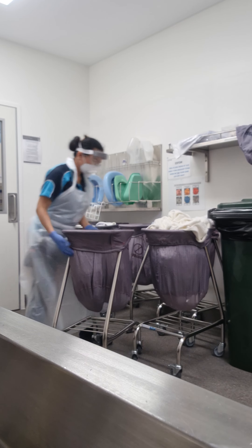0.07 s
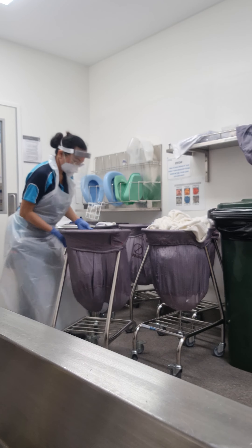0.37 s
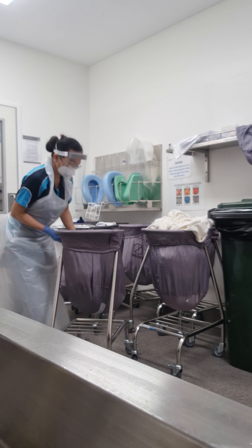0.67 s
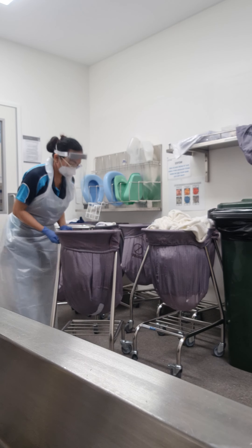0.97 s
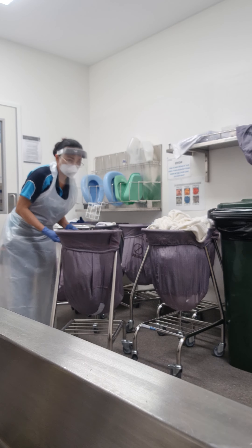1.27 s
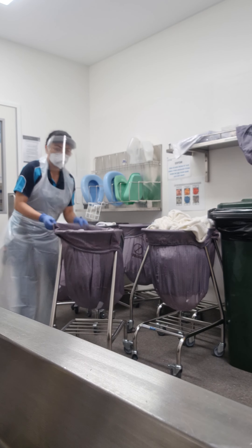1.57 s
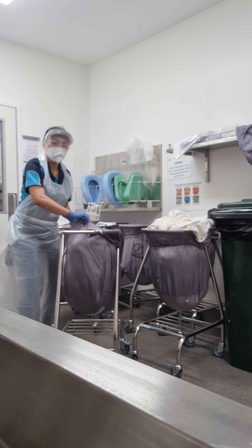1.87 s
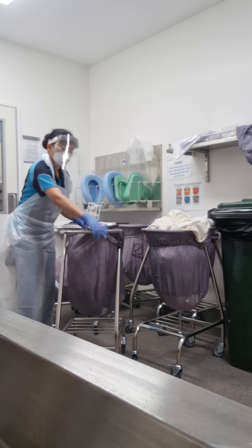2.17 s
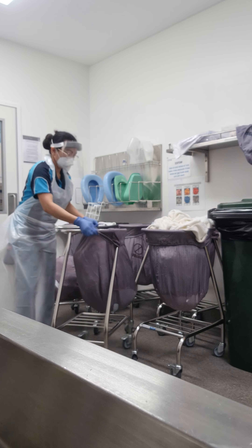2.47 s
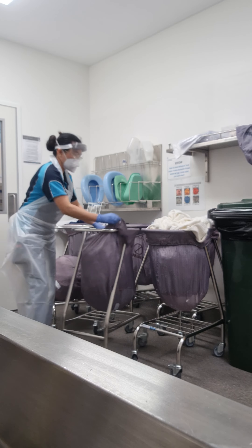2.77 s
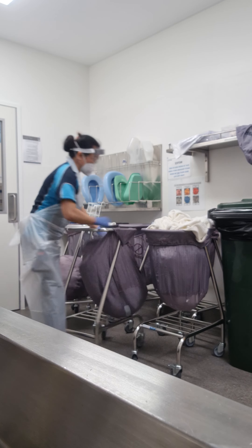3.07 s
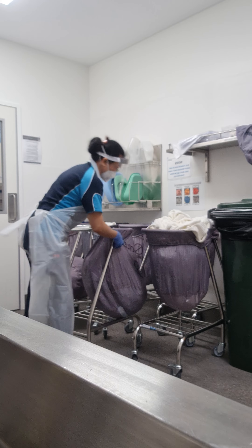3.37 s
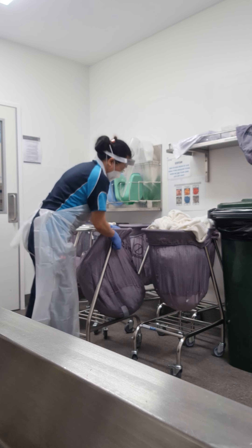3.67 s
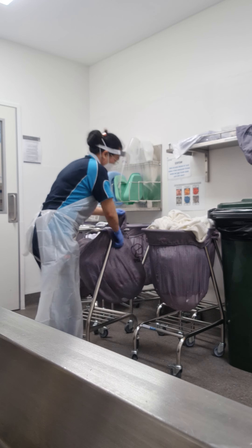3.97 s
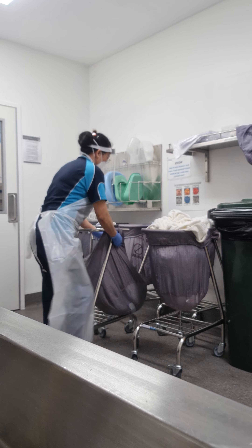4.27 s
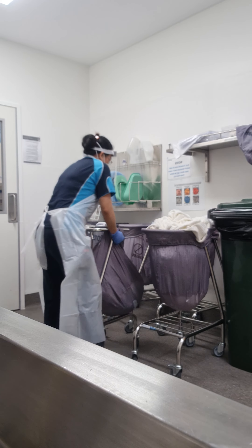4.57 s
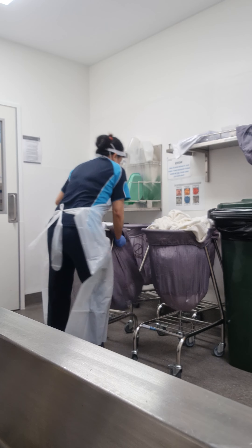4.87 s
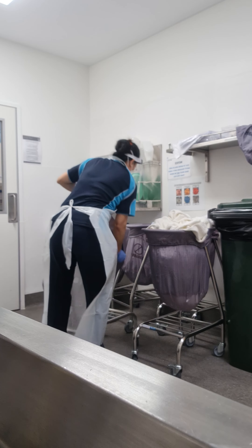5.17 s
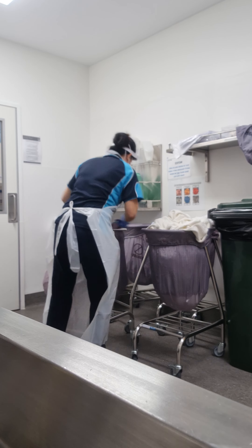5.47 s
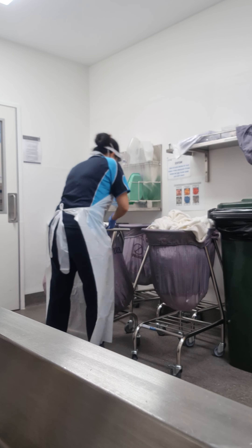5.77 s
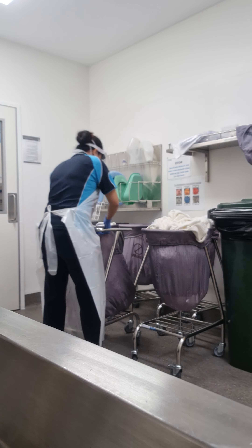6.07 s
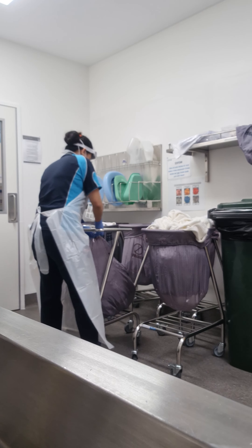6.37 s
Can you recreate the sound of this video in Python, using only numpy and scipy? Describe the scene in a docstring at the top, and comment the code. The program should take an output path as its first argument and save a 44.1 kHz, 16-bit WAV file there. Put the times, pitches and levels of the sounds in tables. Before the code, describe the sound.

In a small, hard-walled room with humming ventilation, soft steps and a scuffing sole mix with rustling plastic. A steel laundry cart is shoved in short bursts, its castors rumbling and its frame rattling, and one wheel squeaks briefly. About halfway it crashes into another cart. Lighter knocks and a small clink follow as it is parked. Everything sounds a few steps away, with a short echo.

```python
"""A steel-tube laundry cart is swung round and parked in a small, hard-walled room; ventilation hums.
Soft steps and a scuffing sole come first; a plastic apron and bags rustle as the arms move.
Shoves set the castors rumbling and the loose frame rattling; one castor sticks and squeaks at 1.7 s.
At 3.1 s the frame crashes against the next cart, and lighter knocks follow.
A small fitting clinks at 5.3 s; a thin tone stands out as the cart comes to rest."""
import sys
import numpy as np
from scipy import signal
from scipy.fft import rfft, irfft, next_fast_len
from scipy.io import wavfile

SR = 44100
rng = np.random.default_rng(int(sys.argv[2]) if len(sys.argv) > 2 else 0)


def materialize(psi):
    """Save the field psi as 16-bit PCM at rate SR to the path in sys.argv[1].

    A 1-D psi becomes a single channel; in a 2-D psi each row is a channel.
    """
    bounded = np.clip(np.atleast_2d(psi).T, -1, 1)
    quanta = np.round(bounded * 32767).astype(np.int16)
    wavfile.write(sys.argv[1], SR, quanta)


N = 283122
TIME = np.arange(N) / SR


def undb(db):
    """Decibels to gain."""
    return 10 ** (np.asarray(db) / 20)


def unit_rms(x):
    """Scale to rms 1."""
    return x / np.sqrt(np.mean(x ** 2))


def unit_energy(x):
    """Scale to a mean energy of 1 per channel."""
    return x / np.sqrt(np.mean(x ** 2) * x.shape[-1])


def at(points, hz):
    """Read (f/Hz, value) points on a log-frequency axis."""
    f, value = np.transpose(points)
    return np.interp(np.log(hz + 1), np.log(f), value)


def shape(x, gain):
    """Filter by gain(hz)."""
    size = next_fast_len(x.shape[-1] + 2048)
    return irfft(rfft(x, size) * gain(np.fft.rfftfreq(size, 1 / SR)), size)[..., :x.shape[-1]]


def colour(x, points):
    """Filter by (f/Hz, level/dB) points."""
    return shape(x, lambda hz: undb(at(points, hz)))


def convolve(x, response):
    """Convolve, cut to the length of x."""
    return signal.fftconvolve(x, response, axes=-1)[..., :x.shape[-1]]


def add(track, t_s, sound):
    """Mix a sound in at t_s."""
    start = int(t_s * SR)
    track[start:start + len(sound)] += sound[:N - start]


def walk(rate_hz):
    """Random drift, spread near 1."""
    knots = rng.standard_normal(1024)
    return np.interp(TIME * rate_hz, np.arange(len(knots)), knots)


def fade(t60_s):
    """Exponential decay, 0.5 s long."""
    return np.exp(-np.log(1000) * TIME[:SR // 2] / t60_s)


def swell(rows):
    """Envelope through (t/s, level/dB) rows; silent outside them."""
    t_s, db = np.transpose(rows)
    return undb(np.interp(TIME, t_s, db, left=-np.inf, right=-np.inf))


def gestures(rows, attack_s, release_s):
    """Power-summed envelope of (t/s, length/s, level/dB) holds; attack and release are per 20 dB."""
    power = 0
    for t_s, length_s, db in rows:
        away = np.maximum(t_s - TIME, 0) / attack_s + np.maximum(TIME - t_s - length_s, 0) / release_s
        power = power + undb(db - 20 * away) ** 2
    return np.sqrt(power)


def grains(rate_hz, spread_db):
    """Dense random clicks of uneven size, rms 1."""
    sizes = undb(spread_db * np.minimum(rng.exponential(size=N), 4))
    return unit_rms((rng.random(N) < rate_hz / SR) * sizes * rng.standard_normal(N))


def thud(points, t60_s):
    """Decaying noise burst coloured by (f/Hz, level/dB) points."""
    return unit_energy(colour(rng.standard_normal(SR // 2), points) * fade(t60_s))


# Stereo width: f/Hz, side minus mid/dB
SIDE_LEVEL = [(60, -14), (150, -17), (280, -22), (500, -10), (1000, 2.5), (2200, -1), (5000, 0)]
def diffuse(size):
    """Noise from all sides: alike left and right in the bass, unrelated in the treble."""
    mid, side = rng.standard_normal((2, size))
    side = colour(side, SIDE_LEVEL)
    stereo = np.array([mid + side, mid - side])
    return shape(stereo, lambda hz: 1 / np.sqrt(1 + undb(at(SIDE_LEVEL, hz)) ** 2))


# Standing-wave peaks and dips: f/Hz, level/dB
ROOM_SPECTRUM = [(120, 0), (165, 7), (210, -11.5), (290, 2), (390, -2), (480, -0.5), (800, 1.5)]
# Room decay: f/Hz, t60/s
ROOM_DECAY = [(100, 0.58), (500, 0.78), (2500, 0.61), (6000, 0.59), (14000, 0.39)]
def room(direct_db, build_s=0.0014, right_lag_s=0.00032):
    """Direct sound arrives left first; close bare walls follow with a dense tail."""
    t = TIME[:SR]
    noise = colour(diffuse(SR), ROOM_SPECTRUM)
    octaves = np.log2(125) + np.arange(8)
    tail = 0
    for octave, share in zip(octaves, np.eye(len(octaves))):
        band = shape(noise, lambda hz: np.interp(np.log2(hz + 1), octaves, share))
        tail = tail + band * np.exp(-np.log(1000) * t / at(ROOM_DECAY, 2 ** octave))
    response = unit_energy(tail * (1 - np.exp(-t / build_s)))
    response[0, 0] += undb(direct_db)
    response[1, int(right_lag_s * SR)] += undb(direct_db)
    return unit_energy(response)


# Duct noise: f/Hz, relative level/dB
AIR_SPECTRUM = [(15, -55.5), (25, -7), (49, -9), (109, -3), (139, -9), (278, -4.5), (318, -10.5),
                (475, -14.5), (558, -22), (790, -16), (927, -24.5), (1960, -20), (2130, -27), (5570, -27),
                (15000, -41.5)]
# Fan and mains lines: f/Hz, level/dB re hum_db
HUM_LINES = [(60, -59), (103, -59), (120, -62.5), (166.9, -62.5), (204.6, -81), (247.6, -63.5),
             (484.5, -68), (990.5, -82.5), (1981, -74.5)]
def ventilation(air_db=-53, hum_db=-1, flutter_db=2, wander_hz=1.173):
    """Duct noise with wavering fan and mains lines."""
    air = unit_rms(colour(diffuse(N), AIR_SPECTRUM + [(16000, -64)]))
    air = colour(air, [(1000, -0.5), (3000, 1), (8000, -2.5)]) * undb(0.5 * walk(6.7))
    hum = 0
    for hz, db in HUM_LINES:
        amplitude = np.sqrt(2) * undb(db + flutter_db * walk(5.2))
        phase = 2 * np.pi * np.cumsum(hz + wander_hz * walk(11)) / SR
        hum = hum + amplitude * np.sin(phase)
    return undb(air_db) * air + undb(hum_db) * hum


def thin_tone(hz=1981):
    """A faint steady pitch swells as the cart is parked."""
    return np.sin(2 * np.pi * hz * TIME) * swell([(5.5, -67), (5.9, -64), (6.42, -73)])


# Footfalls: t/s, level/dB re step_db
FOOTFALLS = [(0.039, -44), (0.801, -45), (1.999, -51), (3.25, -45), (4.243, -55), (4.831, -51),
             (5.2, -42.5), (5.618, -41)]
def steps(step_db=26):
    """Soft soles thump the floor."""
    spectrum = [(25, -35), (58, 7.5), (100, -7), (170, -15.5), (400, -25), (2000, -38)]
    out = np.zeros(N)
    for t_s, db in FOOTFALLS:
        add(out, t_s, undb(db + step_db) * thud(spectrum, t60_s=0.24))
    return out


# Slide of the sole: t/s, level/dB
SCUFF_ENVELOPE = [(.38, -62), (.44, -48.5), (.52, -47), (.58, -57), (.63, -76)]
# Grit under the sole: f/Hz, relative level/dB
SCUFF_SPECTRUM = [(200, -27), (600, -2), (1050, -4.5), (1800, -1), (3200, -0.5), (6500, -4.5), (8000, -16),
                  (15000, -23)]
def scuff():
    """A rubber sole drags over fine grit."""
    grit = colour(grains(rate_hz=6600, spread_db=4.5), SCUFF_SPECTRUM)
    return unit_rms(grit) * swell(SCUFF_ENVELOPE)


# Arm movements: t/s, length/s, level/dB
ARM_MOVES = [(.14, 0.034, -55), (.44, .04, -57.5), (.84, .19, -61), (1.66, 0.047, -53), (1.88, 0.16, -50),
             (2.26, 0.025, -55), (2.58, 0.078, -53), (3.18, 0.11, -43), (3.82, 0.033, -48),
             (4.22, 0.076, -48), (4.55, 0.26, -53.5), (5.14, .12, -51.5), (5.61, 0.043, -52)]
# Faint stirring of the apron: t/s, length/s, level/dB
APRON_STIR = [(0, 6.08, -63.5)]
# Creasing: f/Hz, relative level/dB
RUSTLE_SPECTRUM = [(400, 0), (1500, -2), (3500, -4.5), (6500, -2.5), (8000, -9.5), (11500, -10.5),
                   (15500, -13)]
def rustle():
    """Thin plastic and cloth crease in tiny snaps as the arms move."""
    creasing = gestures(ARM_MOVES + APRON_STIR, attack_s=0.39, release_s=0.33)
    snaps = colour(grains(rate_hz=5900, spread_db=6.0), RUSTLE_SPECTRUM)
    return unit_rms(snaps) * creasing


# Castor squeak: t/s, length/s, level/dB
CASTOR_SLIPS = [(1.728, 0.033, -33.5)]
def squeak(resonance_hz=2468, waver=0.0035):
    """A dry castor sticks and slips at one resonance, almost a pure tone."""
    pitch_hz = resonance_hz * (1 + waver * walk(150))
    slipping = gestures(CASTOR_SLIPS, attack_s=0.022, release_s=0.06)
    return np.sqrt(2) * np.sin(2 * np.pi * np.cumsum(pitch_hz) / SR) * slipping


def chatter(length_s, count=24, scatter_db=2.0):
    """Force of loose metal meeting: an uneven run of contacts that builds, then lets go."""
    progress = (np.arange(count) + rng.random(count)) / count
    sizes = rng.choice([-1, 1], count) * undb(scatter_db * rng.standard_normal(count))
    arch = np.sin(np.pi * progress ** 0.52)
    force = np.zeros(SR // 2)
    np.add.at(force, (progress * length_s * SR).astype(int), sizes * arch)
    return unit_energy(force)


def ring(modes, t60_3khz_s, split=0.0065):
    """Steel modes in close pairs, as a tube bends in two planes; high ones die sooner."""
    t = TIME[:SR // 3]
    hz, db = np.repeat(modes, 2, axis=0).T[..., None]
    hz = hz * (1 + split * (2 * rng.random(hz.shape) - 1))
    waves = np.sin(2 * np.pi * (hz * t + rng.random(hz.shape)))
    decay = np.exp(-np.log(1000) * t / (t60_3khz_s * np.sqrt(3000 / hz)))
    weights = undb(db + 2 * rng.standard_normal(db.shape))
    return unit_energy(np.sum(weights * waves * decay, axis=0))


def taps(events, modes, t60_3khz_s, strike_db):
    """A loose part chatters against the frame and rings in its own modes."""
    out = np.zeros(N)
    for t_s, db, length_s in events:
        ringing = convolve(chatter(length_s), ring(modes, t60_3khz_s))
        add(out, t_s, undb(db + strike_db) * unit_energy(ringing))
    return out


# Fitting contacts: t/s, level/dB re strike_db, chatter/s
FITTING_HITS = [(5.255, -28.5, .007), (5.260, -36.5, 0.012)]
# Fitting modes: f/Hz, relative level/dB
FITTING_PARTIALS = [(2310, -8.5), (2487, -17), (4560, -7), (4690, -7), (4810, 4.5), (4970, -0.5), (5140, 3),
                    (5290, -12), (6950, -10), (9350, -33)]
def fitting():
    """A small steel fitting clinks."""
    return taps(FITTING_HITS, FITTING_PARTIALS, t60_3khz_s=0.015, strike_db=30)


# Hoop contacts: t/s, level/dB re strike_db, chatter/s
HOOP_HITS = [(0.512, -55, 0.031), (0.79, -58, 0.016), (3.768, -26.5, 0.0098), (3.782, -42, .025),
             (3.978, -43.5, .025), (5.295, -44, 0.025), (5.565, -45.5, 0.027), (5.672, -43, 0.027)]
# Hoop modes: f/Hz, relative level/dB
HOOP_PARTIALS = [(1790, 0), (2080, 1), (2335, 1.5), (2465, 4), (2585, -5), (3020, 1), (3220, -6)]
def hoop():
    """The hoop holding the bag knocks, barely ringing."""
    return taps(HOOP_HITS, HOOP_PARTIALS, t60_3khz_s=0.012, strike_db=31.5)


# Shelf contacts: t/s, level/dB re strike_db, chatter/s
SHELF_HITS = [(2.02, -41, .045), (2.665, -42.5, 0.01), (2.88, -48, 0.02), (3.089, -17.5, 0.0042),
              (3.128, -22, 0.0055), (3.772, -30, .02), (4.612, -35.5, .018)]
# Shelf modes: f/Hz, relative level/dB
SHELF_PARTIALS = [(2280, -15.5), (3070, -6), (3680, -1), (4310, -7), (4400, 4.5), (4870, -2), (5650, -0.5),
                  (6780, -5), (8660, -4), (11500, -23)]
def shelf():
    """The wire shelf is jolted and rings briefly."""
    return taps(SHELF_HITS, SHELF_PARTIALS, t60_3khz_s=0.049, strike_db=25.5)


# Wires and joints: f/Hz, relative level/dB
CLATTER_SPECTRUM = [(150, -21), (310, -19), (400, -14.5), (640, -8), (1050, -10.5), (1370, -6.5),
                    (1900, -4.5), (2350, 4.5), (3100, -4), (4500, -7), (6900, -15), (8000, -19),
                    (11600, -24), (15500, -34)]
# Tube modes: f/Hz, relative level/dB
TUBE_PARTIALS = [(1328, -8), (2287, 4), (2356, 6), (2451, -6), (2569, 0.5), (2767, -2), (2831, -12.5),
                 (2975, 4), (3051, -7.5), (3109, 1.5), (3260, 0.5), (3354, -10), (3656, -16.5),
                 (3721, -13.5), (4001, -5.5), (4308, -2), (4533, -1), (4683, -5), (4823, -2), (5464, -15),
                 (6470, -11), (6980, -5.5), (11500, -3)]
def frame(force, clatter_t60_s=0.0076, ring_db=-4):
    """Each contact sets off a brief clatter of wires and joints and rings the tubes."""
    energy = convolve(force ** 2, fade(clatter_t60_s) ** 2)
    clatter = colour(np.sqrt(np.abs(energy)) * rng.standard_normal(len(force)), CLATTER_SPECTRUM)
    tubes = convolve(force, ring(TUBE_PARTIALS, t60_3khz_s=0.083, split=0.0048))
    return np.std(force) * (unit_rms(clatter) + undb(ring_db) * unit_rms(tubes))


# Shoves: t/s, length/s, rumble level/dB, joint drive level/dB
CART_SHOVES = [(0.0, .03, -55, -66), (0.504, 0.022, -57, -46), (.79, 0.025, -65, -66.5),
               (1.939, 0.075, -50, -37), (2.25, .04, -54, -61), (2.78, 0.18, -57.5, -44),
               (3.06, 0.16, -49, -58), (3.88, 0.089, -59, -53.5), (4.212, .04, -55.5, -66),
               (4.457, 0.03, -52.5, -70), (5.19, 0.12, -59.5, -40), (5.57, 0.068, -53, -48)]
# Castor rumble: f/Hz, relative level/dB
RUMBLE_SPECTRUM = [(100, -21), (280, 4.5), (400, -2), (620, 0), (1050, -11.5), (1500, -8.5), (2500, -19),
                   (6000, -56.5)]
def rolling(rattle_db=-1, creep_db=-64.5, attack_s=0.15, release_s=0.053):
    """Shoved castors bump over the gritty floor and shake loose joints; between shoves they creep."""
    t_s, length_s, castor_db, joint_db = np.transpose(CART_SHOVES)
    travel = gestures(zip(t_s, length_s, castor_db), attack_s, release_s) + undb(creep_db)
    shaking = gestures(zip(t_s, length_s, joint_db), attack_s, release_s)
    force = grains(rate_hz=830, spread_db=5.0) * shaking
    rattle = colour(frame(force), [(500, -7), (2500, -5.5), (5000, -7.5), (12000, 0.5)])
    rumble = unit_rms(colour(grains(rate_hz=1800, spread_db=1.5), RUMBLE_SPECTRUM)) * travel
    return undb(rattle_db) * rattle + rumble


# Blows on the frame: t/s, level/dB re strike_db, chatter/s, treble tilt/(dB/octave), base gain/dB
FRAME_HITS = [(0.780, -50, 0.019, -3, -1), (1.985, -36, .05, -3, 2), (2.663, -42, 0.022, -2, 12),
              (2.873, -32, .025, 0.5, 8.5), (3.082, -19.5, 0.0098, -0.5, 2), (3.090, -12, .018, 2.5, 2),
              (3.098, -18.5, 0.018, 4, -4), (3.126, -24, .014, -2, -13), (3.18, -20, 0.016, 3.5, -6),
              (3.748, -36, 0.014, -1, -6), (3.760, -28.5, 0.013, 3.5, 12.5), (3.778, -33, 0.026, 4, 7),
              (4.610, -38, 0.028, 0, 12), (5.250, -40, 0.017, 5, -16)]
def blows(strike_db=29, thud_db=-23, boom_db=-24, boom_hz=97, boom_t60_s=0.1):
    """The frame is knocked; the loaded base thuds and bounces on its castors."""
    thud_spectrum = [(40, -15), (100, 1), (190, -10), (310, -4), (400, 4), (620, 5.5),
                     (1200, -11.5), (4000, -61)]
    boom = unit_energy(np.sin(2 * np.pi * boom_hz * TIME[:SR // 2]) * fade(boom_t60_s))
    out = np.zeros(N)
    for t_s, db, length_s, tilt_db_oct, base_db in FRAME_HITS:
        metal = frame(chatter(length_s))
        metal = shape(metal, lambda hz: undb(tilt_db_oct * np.log2(np.maximum(hz, 1500) / 3000)))
        base = undb(thud_db) * thud(thud_spectrum, t60_s=0.067) + undb(boom_db) * boom
        add(out, t_s, undb(db + strike_db) * (metal + undb(base_db) * base))
    return out


def scene():
    """Cart, apron and feet are heard mostly through the room, the squeak mostly direct."""
    loose_parts = hoop() + shelf()
    clinks = fitting()
    handling = loose_parts + blows() + rolling() + rustle() + scuff() + steps()
    heard = convolve(handling[None], room(direct_db=-6.0))
    heard += convolve(clinks[None], room(direct_db=-6.5))
    heard += convolve(squeak()[None], room(direct_db=16.0))
    return heard + ventilation() + thin_tone()


# Channel balance: f/Hz, left minus right/dB
BALANCE = [(120, -0.5), (280, 0), (500, -7), (1000, -4.5), (2200, -1), (5000, -3)]
def record(dry):
    """Right side louder, most near 500 Hz; steep treble cut."""
    tilted = shape(dry, lambda hz: undb(np.outer([0.5, -0.5], at(BALANCE, hz))))
    cutoff_hz = 15750
    return signal.sosfilt(signal.ellip(10, 0.2, 80, cutoff_hz, fs=SR, output="sos"), tilted)


dry = scene()
out = record(dry)
materialize(out)
```